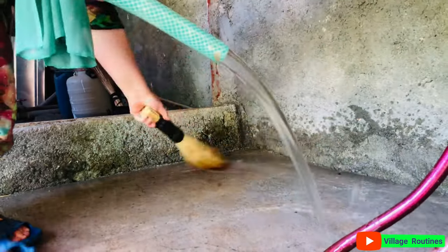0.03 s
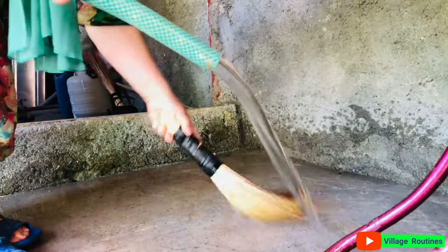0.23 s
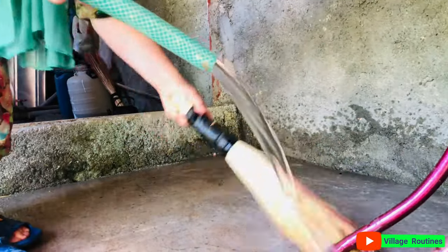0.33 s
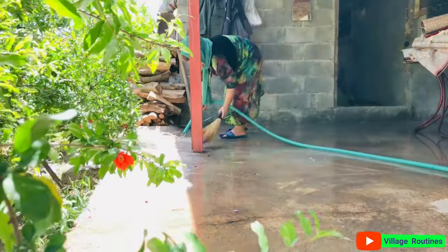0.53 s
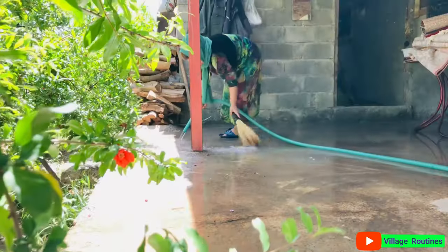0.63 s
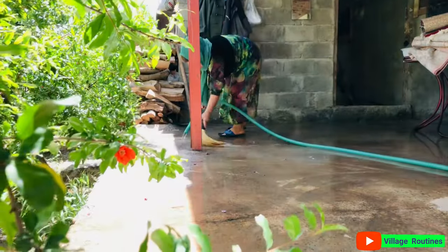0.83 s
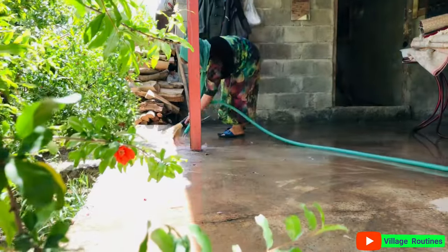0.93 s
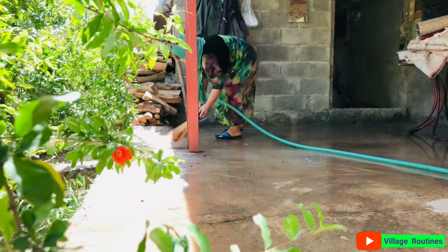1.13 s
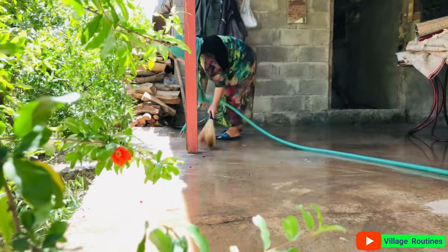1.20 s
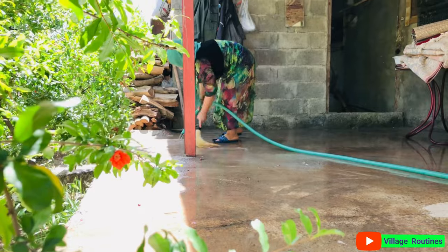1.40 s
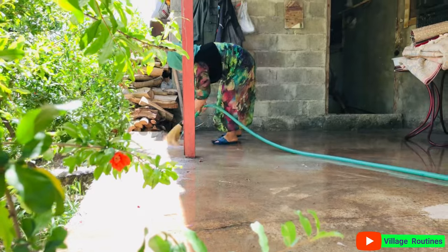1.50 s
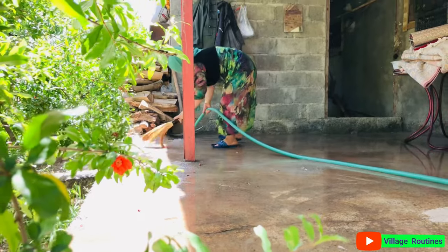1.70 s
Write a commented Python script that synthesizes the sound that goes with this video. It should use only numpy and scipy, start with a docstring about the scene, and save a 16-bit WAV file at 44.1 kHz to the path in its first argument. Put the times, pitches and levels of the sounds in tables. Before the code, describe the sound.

Scratchy strokes of a straw broom on a wet concrete yard, first close to the microphone with a faint low hum, then softer from a distance. A hose runs throughout, lightly fizzing, bubbling and splattering on the ground.

```python
"""A short straw broom scrubs a wet concrete yard while a hose runs: close by, then from across the yard.
Each stroke is a dense crackle of straw tips that reaches lower in pitch as the bundle is pressed flat.
Water fizzes on the slab throughout. A low hum is heard only close by; the distant position adds
ringing bubbles, splats and one faint falling tone."""
import sys
import numpy as np
from scipy import signal
from scipy.fft import rfft, irfft
from scipy.io import wavfile
from scipy.ndimage import uniform_filter1d

SR = 44100
rng = np.random.default_rng(int(sys.argv[2]) if len(sys.argv) > 2 else 0)


def unload_audio(sound):
    """Save the sound as a 16-bit wav file, at the path given as the first command line argument."""
    columns = np.transpose(np.atleast_2d(sound))
    # keep every value between -1 and 1, then stretch to whole-number steps
    steps = np.round(np.clip(columns, -1, 1) * 32767)
    wavfile.write(sys.argv[1], SR, steps.astype(np.int16))


N = 77175
T = np.arange(N) / SR


def amp(db):
    """Decibels to gain."""
    return 10 ** (np.asarray(db) / 20)


def unit(x):
    """Scales to rms 1."""
    return x / np.sqrt(np.mean(x ** 2) + 1e-20)


def bell(x, sigma):
    """Gaussian with peak 1 at x = 0."""
    return np.exp(-.5 * (x / sigma) ** 2)


def read(points, hz):
    """Interpolates a table on a log-frequency axis."""
    f, value = np.transpose(points)
    return np.interp(np.log(hz + 1), np.log(f + 1), value)


def colour(x, gain):
    """Filters x by gain(hz)."""
    return irfft(rfft(x) * gain(np.fft.rfftfreq(len(x), 1 / SR)), len(x))


def clicks(per_s, spread_db=2.5):
    """Random clicks of uneven size and either sign."""
    hits = rng.random(N) < per_s / SR
    sizes = amp(spread_db * np.minimum(rng.exponential(1, N), 4))
    return hits * sizes * rng.choice([-1., 1.], N)


def crackle(gain, snap_share, patchy_db):
    """Tiny snaps over hiss, in shifting patches, through a moving filter gain(hz, s)."""
    snaps = np.sqrt(snap_share) * unit(clicks(per_s=5000))
    hiss = np.sqrt(1 - snap_share) * rng.standard_normal(N)
    hz, t, z = signal.stft(snaps + hiss, SR, nperseg=512, noverlap=384)
    patches = uniform_filter1d(rng.standard_normal(z.shape), size=9, axis=0)
    patches = unit(uniform_filter1d(patches, size=4, axis=1))
    shaped = z * amp(patchy_db * patches) * gain(hz[:, None], t)
    return signal.istft(shaped, SR, nperseg=512, noverlap=384)[1][:N]


def broom(strokes, straw, tip_rise_oct, spring_s, leak_db):
    """Straw tips bite and scrape the slab; the flatter the bundle lies, the lower the scrape reaches."""
    # strokes: (full contact [s], 20 dB attack [s], hold [s], 20 dB release [s], level [dB],
    #   sag over hold [dB], time to lie flat [s], low edge when flat [Hz], bite at bite_hz [dB])
    # straw: (frequency [Hz], relative density [dB])
    flex_s, edge_db_per_oct = 0.067, 19.5
    bite_hz, bite_after_s, bite_s = 7100, 0.023, 0.029
    straw_rms = np.sqrt(np.mean(amp(read(straw, np.linspace(0, SR / 2, 256))) ** 2))
    out = np.zeros(N)
    for contact_s, attack_s, hold_s, release_s, db, sag_db, flat_s, edge_hz, bite_db in strokes:
        def bundle(hz, t):
            age = t - contact_s
            # The bundle straightens more slowly than it bends.
            flatness = np.exp(-((age - flat_s) / np.where(age < flat_s, flex_s, spring_s)) ** 2)
            below_edge_oct = np.log2(edge_hz / (hz + 1)) + tip_rise_oct * (1 - flatness)
            low_cut = np.sqrt(1 / (1 + amp(edge_db_per_oct * below_edge_oct) ** 2) + amp(leak_db) ** 2)
            bite = np.exp(-((age - bite_after_s) / bite_s) ** 2)
            treble_shelf = 2 * hz ** 2 / (hz ** 2 + bite_hz ** 2)
            return amp(read(straw, hz) + bite_db * bite * treble_shelf) / straw_rms * low_cut
        attack_db = 20 * np.maximum(contact_s - T, 0) / attack_s
        release_db = 20 * np.maximum(T - contact_s - hold_s, 0) / release_s
        level_db = db - attack_db - release_db - sag_db * np.clip((T - contact_s) / hold_s, 0, 1)
        out += amp(level_db) * crackle(bundle, snap_share=0.48, patchy_db=1.69)
    return out


def yard(x, wet_db, echoes=()):
    """First reflections from slab and walls, then a short open-air tail."""
    # Tail decay: (frequency [Hz], T60 [s])
    t60 = [(200, 0.26), (2000, 0.49), (12000, 0.2)]
    build_s = 0.013
    hz, t, z = signal.stft(rng.standard_normal(16384), SR, nperseg=256)
    decay = amp(-60 * t / read(t60, hz)[:, None])
    tail = signal.istft(z * decay * np.minimum(t / build_s, 1), SR, nperseg=256)[1]
    response = amp(wet_db) * tail / np.linalg.norm(tail)
    response[0] += 1
    for delay_s, gain in echoes:
        response[round(delay_s * SR)] += gain
    return signal.fftconvolve(x, response / np.linalg.norm(response))[:N]


def hose_wash(spectrum, db):
    """Fizz of hose water on concrete over the low outdoor background."""
    fizz = crackle(lambda hz, t: 1, snap_share=0.37, patchy_db=2)
    return amp(db) * unit(colour(fizz, lambda hz: amp(read(spectrum, hz))))


def hum():
    """A low, rough but even hum near the wall: noise in a few narrow resonances."""
    # Resonances: (centre [Hz], sigma [Hz], level before evening out [dB])
    resonances = [(95, 11, -68.5), (176.7, 12, -56), (211, 15, -58.5), (290, 16, -66)]
    steadiness = .8  # 0 = restless, 1 = even
    x = np.zeros(N)
    for centre_hz, sigma_hz, db in resonances:
        x += amp(db) * unit(colour(rng.standard_normal(N), lambda hz: bell(hz - centre_hz, sigma_hz)))
    swell = np.sqrt(abs(uniform_filter1d(x ** 2, size=900)) / np.mean(x ** 2))
    return x / (swell + 1e-6) ** steadiness


def bubbles(per_s=300, decay_cycles=4, db=-61):
    """Small bubbles in the running water, each ringing for a few cycles."""
    t, out = np.arange(1500) / SR, np.zeros(N)
    pitches_hz = np.geomspace(458.4, 2566, 24)
    for hz in pitches_hz:
        envelope = np.exp(-hz * t / decay_cycles) * (1 - np.exp(-hz * t))
        ring = np.sin(2 * np.pi * hz * t) * envelope
        out += signal.oaconvolve(clicks(per_s / len(pitches_hz)), ring)[:N]
    return amp(db) * unit(out)


def splats(rise_s=0.00048):
    """Larger slaps of water: short noise bursts round one pitch."""
    # Water slaps: (time [s], level [dB], pitch [Hz], sigma [oct], decay [s])
    slaps = [(0.392, -43, 1500, 0.25, 0.0066), (0.447, -39, 1750, 1, 0.0088),
             (0.515, -46, 1370, 0.14, 0.0054), (1.094, -43.5, 780, 0.41, 0.006),
             (1.144, -48.5, 569, .25, 0.0044), (1.159, -50.5, 3660, 0.29, 0.0034),
             (1.213, -49, 910, .4, 0.011), (1.642, -41.5, 4030, 0.2, 0.0036),
             (1.662, -48.5, 2200, 0.12, .006), (1.69, -47.5, 1490, 0.7, 0.0087),
             (1.701, -46.5, 566, 0.27, 0.0077)]
    t, out = np.arange(4096) / SR, np.zeros(N)
    for start_s, db, pitch_hz, sigma_oct, decay_s in slaps:
        noise = rng.standard_normal(len(t))
        band = colour(noise, lambda hz: bell(np.log2((hz + 1) / pitch_hz), sigma_oct))
        envelope = (1 - np.exp(-t / rise_s)) * np.exp(-t / decay_s)
        envelope /= envelope.max()
        burst = band * envelope
        burst *= np.linalg.norm(envelope) / np.linalg.norm(burst)
        slot = out[round(start_s * SR):][:len(t)]
        slot += amp(db) * burst[:len(slot)]
    return out


def faint_tone(peak_s=1.0, sigma_s=.035, pitch_hz=322, glide_hz_per_s=-250, db=-57.5):
    """A faint low tone that swells, sinks a little and fades."""
    hz = pitch_hz + glide_hz_per_s * (T - peak_s)
    tone = np.sin(2 * np.pi * np.cumsum(hz) / SR)
    return amp(db) * unit(tone) * bell(T - peak_s, sigma_s)


def close_by():
    """Broom, hose and hum from the close position."""
    # Two strokes and their straw spectrum; columns as in broom()
    strokes = [ (0.002, .06, 0.014, .028, -35.5, 1, 0.004, 2900, 0),
               (0.132, .076, 0.154, .055, -21.2, 2.6, 0.074, 1160, 2)]
    straw = [(100, -13), (1000, -4.5), (2000, -3), (3000, -2.5), (4000, 0.5), (6000, 0.5), (8700, -1.5),
             (10000, -6), (12500, -10.5), (16000, -19)]
    # Slab and wall reflections: (delay [s], gain [re direct])
    echoes = [(.0009, 0.089), (.0024, .13), (.0056, 0.095), (.0093, 0.084)]
    # Water and background: (frequency [Hz], relative density [dB])
    wash_spectrum = [(20, -35), (50, -20), (95, 2.5), (130, -8.5), (190, 5), (280, -3), (400, -10.5),
                     (700, -13), (1600, -9.5), (3600, 0), (8000, -41), (16000, -32)]
    scrub = broom(strokes, straw, tip_rise_oct=1.9, spring_s=0.24, leak_db=-20.5)
    return yard(scrub, wet_db=-11.5, echoes=echoes) + hose_wash(wash_spectrum, db=-46) + hum()


def across_yard():
    """Broom, hose, plops and the faint tone from the distant position."""
    # Pushes and light returns, and their straw spectrum; columns as in broom()
    strokes = [ (0.388, .04, 0.074, 0.2, -45.5, 0, 0.012, 790, -2),
               (0.593, .06, 0.052, .1, -44.5, 1, 0.07, 1600, 4.5),
               (0.766, 0.07, 0.15, 0.19, -34, 1.5, 0.078, 850, 0),
               (1.237, .045, 0.035, 0.7, -44.5, 2, 0.03, 2400, 4),
               (1.362, 0.07, 0.18, 0.13, -33.5, 2.5, 0.071, 830, 2)]
    straw = [(100, -8.5), (900, 1), (1700, 0.5), (2400, -1), (3800, 0), (6000, -3), (8700, -6),
             (10000, -11.5), (12500, -17), (16000, -29)]
    # Slab and wall reflections: (delay [s], gain [re direct])
    echoes = [(.0013, 0.05), (.0041, 0.1), (0.0124, .25), (.019, 0.15)]
    # Water and background: (frequency [Hz], relative density [dB])
    wash_spectrum = [(20, -36), (35, -10), (52, 4.5), (80, 1.5), (130, -3.5), (185, 1.5), (260, -3),
                     (330, 4), (700, -10), (1500, 3), (2400, -4.5), (3800, -2), (5000, -2), (6300, 1),
                     (8700, 2), (10500, -4), (12500, -12.5), (16000, -22)]
    scrub = broom(strokes, straw, tip_rise_oct=1.65, spring_s=0.12, leak_db=-16)
    scrub = yard(scrub, wet_db=-16.5, echoes=echoes)
    fizz = hose_wash(wash_spectrum, db=-49)
    plops = yard(bubbles() + splats(), wet_db=-7)
    return scrub + fizz + plops + faint_tone()


def scene():
    """The close position gives way abruptly to the distant one, with a brief dip; both are mono."""
    move_s, fade_out_s, gap_s, fade_in_s = .3695, 0.0013, 0.0018, 0.011
    near_gain = np.clip((move_s - T) / fade_out_s, 0, 1)
    far_gain = (T > move_s) * np.clip((T - move_s - gap_s) / fade_in_s, .12, 1)
    mono = close_by() * near_gain + across_yard() * far_gain
    return np.array([mono, mono])


def record(dry, cutoff_hz=15750):
    """Steep low-pass band limit."""
    lowpass = signal.firwin(1023, cutoff_hz, window=("kaiser", 9), fs=SR)
    return signal.oaconvolve(dry, lowpass[None], "same")


dry = scene()
out = record(dry)
unload_audio(out)
```